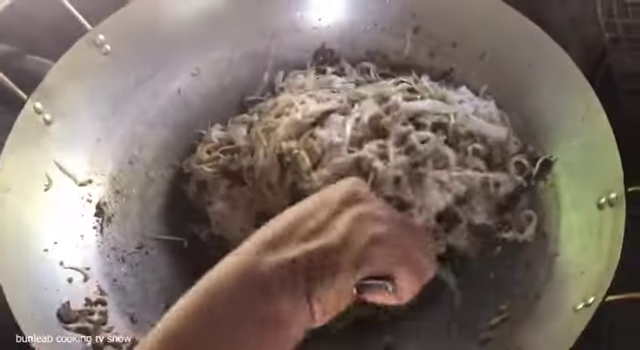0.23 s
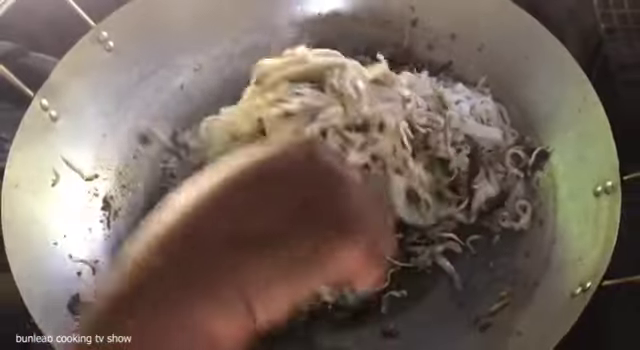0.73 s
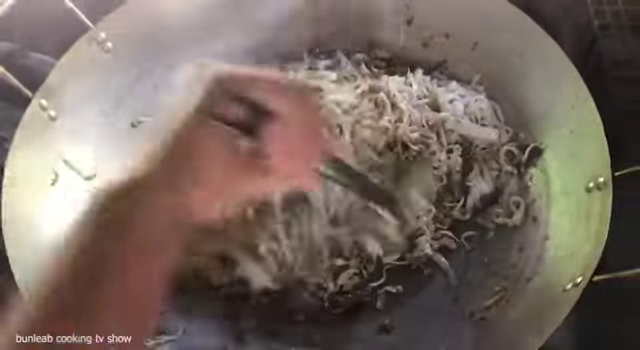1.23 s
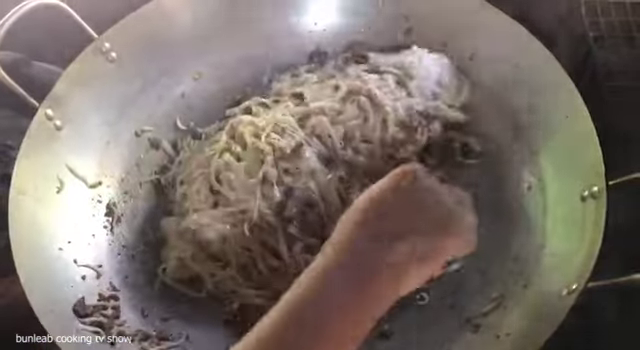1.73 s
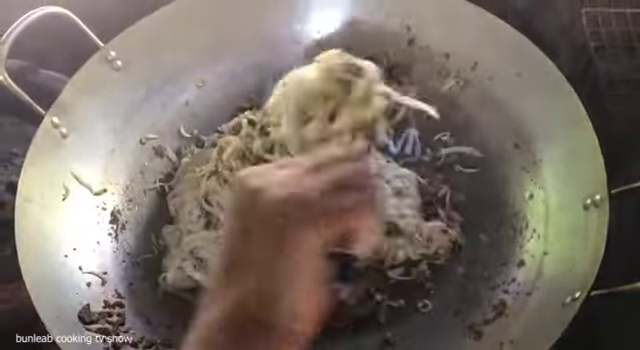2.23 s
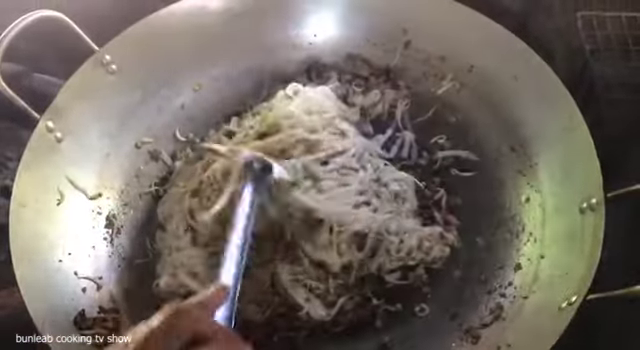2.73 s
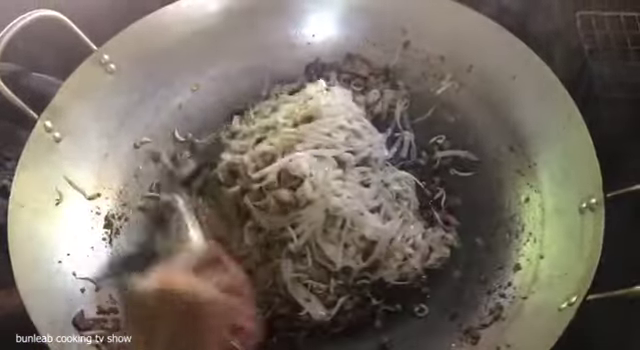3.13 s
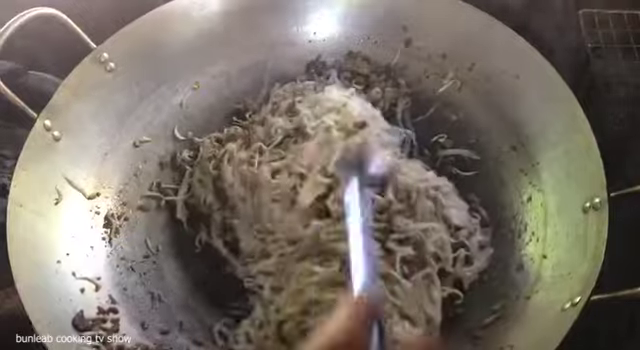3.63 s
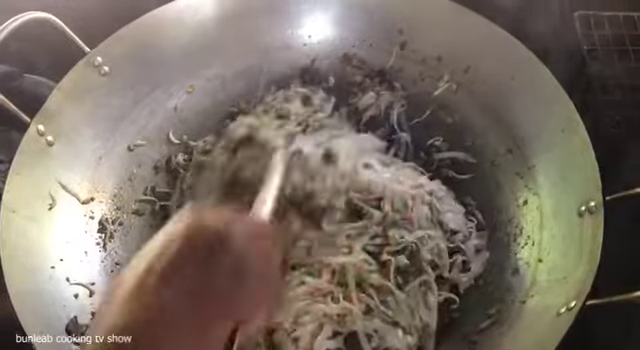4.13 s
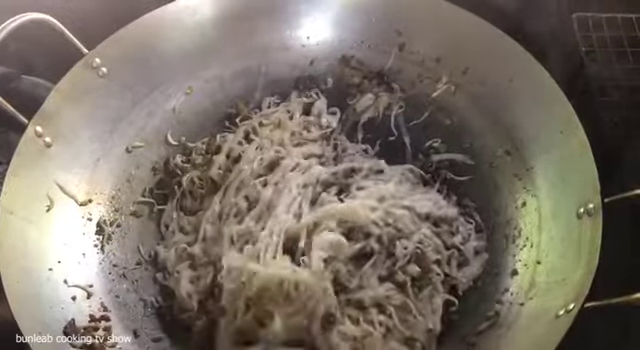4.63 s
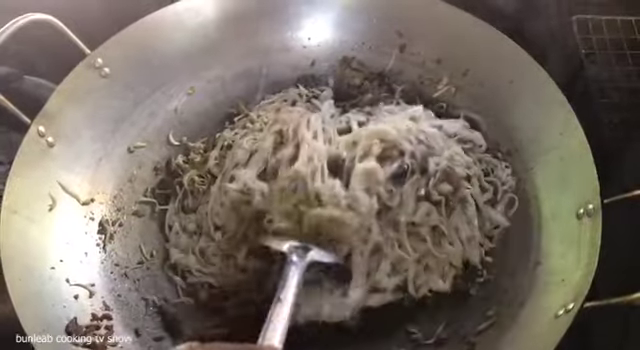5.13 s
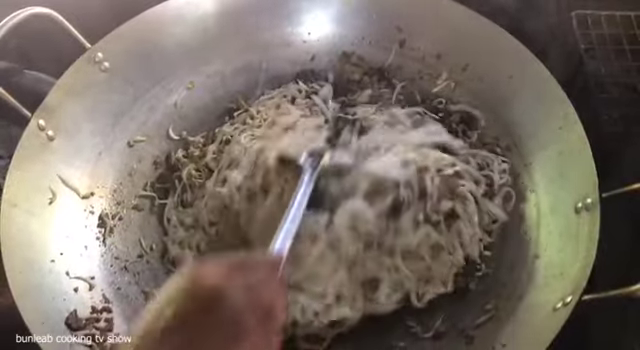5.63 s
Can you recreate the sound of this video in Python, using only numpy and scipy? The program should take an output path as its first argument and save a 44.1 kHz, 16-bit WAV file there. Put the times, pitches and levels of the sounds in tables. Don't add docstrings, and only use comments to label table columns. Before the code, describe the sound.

Continuous wet sizzle and fine crackle, swelling whenever the food is turned. A metal blade drags roughly over steel at the start and again after the first clank; three bouncing metallic knocks ring briefly, damped by the food. Sharp oil spits pop between them. Faint falling bird whistles and a low engine hum sit far behind. Recorded close, almost mono, with slightly dull treble, in an open shed.

```python
import sys
import numpy as np
from scipy import signal
from scipy.io import wavfile

SR = 44100
rng = np.random.default_rng(int(sys.argv[2]) if len(sys.argv) > 2 else 0)


def waveform_to_disk(signal):
    frames = np.transpose(np.atleast_2d(signal))
    scaled = np.clip(frames, -1, 1) * 32767
    samples = np.round(scaled).astype(np.int16)
    wavfile.write(sys.argv[1], SR, samples)


def magnitude_from_level(level_db):
    exponent = np.asarray(level_db, float) / 20
    return 10 ** exponent


N = 260190

# hz, level_db (per Hz)
RUMBLE_SPECTRUM = [(15, -38), (25, -9), (48, 3), (109, 0.5), (144, -5), (189, -7), (237, 0), (301, 0.5),
                   (487, -9), (667, 0), (900, -4), (1170, -34), (1980, -120)]


def rms_one(x):
    return x / np.sqrt(np.mean(x ** 2) + 1e-20)


def in_time(rows):
    s, *columns = np.transpose(rows)
    return [np.interp(np.arange(N) / SR, s, column) for column in columns]


def band(x, low, high):
    return signal.sosfilt(signal.butter(2, [low, min(high, .45 * SR)], "band", fs=SR, output="sos"), x)


def high_pass(x, order, hz):
    return signal.sosfilt(signal.butter(order, hz, "high", fs=SR, output="sos"), x)


def drift(rate_hz):
    r = np.exp(-80 * np.pi * rate_hz / SR)
    slow = signal.lfilter([1], [1, -2 * r, r * r], rng.standard_normal(N // 40 + 2002))[2000:]
    return np.interp(np.arange(N) / 40, np.arange(len(slow)), rms_one(slow))


def bump(t, centre_s, half_length_s):
    return np.clip(1 - np.abs(t - centre_s) / (2 * half_length_s), 0, 1)


def ring(clicks, hz, t60_s):
    r = magnitude_from_level(-60 / (t60_s * SR))
    w = 2 * np.pi * hz / SR
    return signal.lfilter([0, np.sin(w)], [1, -2 * r * np.cos(w), r * r], clicks + 1e-18)


def short_rings(rows):
    out, t = np.zeros(N + 4000), np.arange(4000) / SR
    for s, db, hz, t60 in rows:
        at = round(s * SR)
        onset = 1 - np.exp(-t * hz * 3)
        out[at:at + 4000] += magnitude_from_level(db - 60 * t / t60) * np.sin(2 * np.pi * hz * t) * onset
    return out[:N]


def grains(per_s, spread_db):
    sizes_db = spread_db * np.minimum(rng.exponential(1, N), 5)
    sizes = magnitude_from_level(sizes_db) * rng.choice([-1, 1], N)
    return rms_one(sizes * (rng.random(N) < per_s / SR))


def coloured(sources, spectrum, low, high, patchy_db):
    edges = np.geomspace(low, high, round(3 * np.log2(high / low)) + 1)
    hz, db = np.transpose(spectrum)
    out = 0
    for k, (a, b) in enumerate(zip(edges, edges[1:])):
        level_db = np.interp(np.log(a * b) / 2, np.log(hz), db)
        out = out + magnitude_from_level(level_db + patchy_db * drift(20.0)) * band(sources[k % len(sources)], a, b)
    return rms_one(out)


def frying():
    # hz, level_db (per Hz)
    fry_spectrum = [(260, -44), (450, -1.5), (611, -9.5), (674, -5), (1010, -3.5), (1370, -1.5), (1510, 0),
                    (1810, -3), (3240, -4), (4920, -7), (11200, -10), (12000, -38), (12500, -30),
                    (16200, -60), (22000, -120)]
    # time_s, vigour_db, bare_db (how far bare pan is uncovered)
    sizzle = [(0.0, -43.5, -3), (.55, -47.5, -0.5), (1.17, -44.5, 3), (1.75, -44, -2), (2.55, -41, -2.5),
              (3.17, -45, 0.5), (3.28, -34, -5.5), (3.53, -43, -0.5), (3.75, -43, -5.5), (4.09, -48.5, -3),
              (4.18, -40, -7), (4.67, -45.5, -5), (4.81, -39.5, -0.5), (5.34, -48.5, -1),
              (5.56, -47.5, -3.5), (5.68, -41, -2), (5.8, -40.5, -5.5), (5.9, -47, -2)]
    # time_s, more_sliding_db
    shoves = [
        (.04, 10),
        (.76, 3.5),
        (1.2, 5),
        (1.58, 7),
        (3.28, 5.5),
        (4.13, 4.5),
        (4.93, 6),
    ]
    snaps = grains(400, spread_db=3.5)
    surge = magnitude_from_level(0.17 * drift(1.07))

    def burst(share):
        return [rng.standard_normal(N) + share * grains(3000, spread_db=4.5) + 0.39 * snaps for _ in "ab"]

    crackle_db, bare_db = in_time(sizzle)
    vigour_db = crackle_db + 44
    t = np.arange(N) / SR
    shove_db = sum(db * bump(t, s, 0.11) for s, db in shoves)

    wet = coloured(burst(1.0), fry_spectrum, 533, 1948, patchy_db=0.18)
    wet = magnitude_from_level(-45.5 + 0.66 * vigour_db - 0.22 * bare_db) * wet
    bowl_hz, stirred_hz, width_hz = 1253, 1827, 185
    wet = wet + magnitude_from_level(-9) * band(wet, bowl_hz - width_hz / 2, bowl_hz + width_hz / 2)
    stirred = band(wet, stirred_hz - width_hz, stirred_hz + width_hz)
    wet = wet + magnitude_from_level(-15 + 1.1 * vigour_db) * stirred

    crackle = magnitude_from_level(crackle_db) * coloured(burst(0.72), fry_spectrum, 2070, 4650, patchy_db=1.0)
    crackle = crackle + (magnitude_from_level(0.39 * bare_db) - 1) * band(crackle, 3320, 6640)
    fizz = coloured(burst(0.55), fry_spectrum, 4840, 12060, patchy_db=1.06)
    fizz = magnitude_from_level(-44 + 0.97 * vigour_db + bare_db) * fizz

    slide = coloured(burst(1.0), RUMBLE_SPECTRUM, 176.0, 554, patchy_db=1.0)
    slide = magnitude_from_level(-57 + 0.46 * vigour_db + shove_db) * slide
    return surge * (wet + crackle + fizz + slide)


def spits():
    # start_s, peak_db, pitch_hz
    pops = [(0.264, -26, 1290), (0.4244, -30, 2230), (1.037, -19.5, 1330), (1.31, -24, 1170),
            (1.761, -19, 2200), (2.0971, -20, 1830), (2.3103, -25, 1420), (2.3373, -22, 1420),
            (2.3883, -18, 1630), (2.977, -16, 4150), (4.7836, -15.5, 1750), (4.828, -31, 1350),
            (4.895, -22, 1200), (4.915, -24, 2680)]
    snaps = np.zeros(N)
    for s, db, hz in pops:
        snaps[round(s * SR)] = magnitude_from_level(db + 5.0)
    return short_rings([(s, db, hz, 6 / hz) for s, db, hz in pops]) + band(snaps, 1500, 9000)


def blows():
    # pitch_hz, t60_s, right_wall_db, left_wall_db, far_wall_db
    struck_modes = [(193, 0.041, -15.5, -3, -17), (270, 0.048, -11.5, -9, -1), (300, 0.056, -13, -24, -12),
                    (364, 0.041, -11, 1, 0), (375, 0.21, -11, -24, -28), (476, 0.033, -19, -14, -7),
                    (688, 0.045, -39, -14.5, -23), (974, 0.14, -23.5, -19, -22), (1110, 0.26, -19.5, -20, -15),
                    (1207, 0.047, -14.5, -16, -24), (1627, 0.032, -34, -13, -5), (1868, 0.11, -30, -18, -9.5),
                    (2046, 0.044, -11, -20, -16), (2420, 0.043, -5.5, -7.5, -17),
                    (2720, 0.056, -18, -4.5, -12), (2695, 0.018, -10, 1, -2.5),
                     (3014, 0.014, -2.5, 2.5, 4.5), (3065, 0.035, -6, -26, -2),
                     (3204, 0.017, -15, -16, -10), (3490, 0.029, -11.5, -20, -28),
                     (3894, 0.023, -5.5, -6, -17), (4530, 0.039, -11, -11.5, -9.5),
                     (5320, 0.03, -21, -12.5, -36), (6200, 0.043, -15, -22, -22),
                     (7010, 0.063, -24, -20, -25), (8900, 0.015, -11, -12, -10.5),
                     (9620, 0.025, -13, -12, -24), (11500, 0.013, -20, -30, -12)]
    # low_hz, high_hz, t60_s, right_wall_db, left_wall_db, far_wall_db
    tails = [(215, 500, 0.34, -52, -28, -28), (650, 1190, 0.36, -43, -25.5, -27.5),
             (1540, 1960, 0.32, -40, -36, -28.5), (2430, 3320, 0.39, -25, -28, -29.5),
             (3460, 4660, 0.25, -26, -28, -29.5), (4900, 6700, 0.29, -31.5, -31.5, -31.5),
             (7500, 12000, 0.21, -29.5, -30.5, -32.5)]
    # start_s, ring_db, thud_db, crack_db
    right_wall = [
        (1.379, -48, -64, -45),
        (1.391, -10.5, -15, -12),
        (1.395, -28, -16, -13.5),
        (1.410, -32, -17, -36),
        (1.414, -14, -14, -26),
        (1.431, -17, -20.5, -38),
        (1.437, -16.5, -14.5, -29),
        (1.485, -28, -28, -46),
    ]
    left_wall = [
        (3.06, -7, -15, -17),
        (3.0626, -37, -6.5, -9),
        (3.0668, -21, -16, -18),
        (3.0764, -27, -22.5, -40),
        (3.083, -38, -39, -43),
        (3.113, -29, -32, -46),
        (3.124, -26, -33, -50),
        (3.202, -50, -42.5, -41),
    ]
    far_wall = [
        (3.9593, -5.5, -31, -7.5),
        (3.9634, -8, -10, -26),
        (3.9685, -11, -19.5, -12),
        (3.976, -33, -24, -44),
        (4.001, -28, -36, -47),
    ]
    wall_damping = [0.92, 0.98, 0.91]
    modes = struck_modes
    body, cracks, t = np.zeros(N), np.zeros(N), np.arange(SR // 2) / SR
    for wall, rows in enumerate([right_wall, left_wall, far_wall]):
        s, ring_db, thud_db, crack_db = np.transpose(rows)
        start = round(s[ring_db.argmax()] * SR) - 1000
        at = np.round(s * SR).astype(int) - start
        for i, db in zip(at, crack_db):
            decay = magnitude_from_level(db - 60 * t[:1500] / 0.0092)
            cracks[start + i:start + i + 1500] += decay * rng.standard_normal(1500)
        scatter_db = rng.normal(0, 1.5, (len(modes), 12))
        for k, (hz, t60, *db) in enumerate(modes):
            strength_db = thud_db if hz < 800 else ring_db
            clicks = np.zeros(len(t))
            clicks[at] = magnitude_from_level(strength_db + scatter_db[k, :len(at)])
            sounding = ring(clicks, hz, t60 * wall_damping[wall])
            body[start:start + len(t)] += (-1) ** k * magnitude_from_level(db[wall]) * sounding
        for low, high, t60, *db in tails:
            noise = rms_one(band(rng.standard_normal(len(t)), low, high))
            decay = magnitude_from_level(db[wall] - 60 * t / t60) * np.clip(t / 0.0021, 0, 1)
            body[start + 1000:start + 1000 + len(t)] += decay * noise
    body = high_pass(body, 3, 155)
    return body, band(cracks, 780, 11600)


def scraping():
    # full_pressure_s, rise_s, hold_s, fall_s, level_db (rise and fall span 20 dB)
    strokes = [
        (.044, 0.058, 0.033, 0.079, -24.5),
        (.115, 0.044, 0.047, 0.054, -36),
        (1.56, .13, 0.013, 0.0086, -26),
        (1.582, .02, 0.079, 0.026, -27),
        (3.322, 0.066, 0.015, 0.31, -36.5),
    ]
    # pitch_hz, width_hz, level_db
    blades = [
        [(1070, 57, -7), (2046, 35, 1), (2460, 190, -2), (3040, 110, 0), (3550, 84, -3.5), (3840, 67, -1.5),
         (4220, 360, -7), (5280, 140, -8.5), (6000, 360, -18)],
        [(974, 120, -4), (1746, 17, 2), (1870, 82, -2.5), (2500, 210, -4), (2840, 32, -9), (3360, 110, -3.5),
         (3960, 48, -7), (4140, 85, -10)],
        [(1100, 98, -3), (2010, 27, -6), (2320, 10, 2.5), (2520, 140, -0.5), (3050, 66, -8), (3240, 15, 1),
         (3420, 33, -7), (4040, 43, -0.5), (4620, 40, -4.5)],
        [(1060, 53, -7), (1890, 56, -2), (2574, 30, 4.5), (3000, 73, 3), (3350, 66, -2), (3910, 44, -4),
         (4060, 35, -4), (4470, 120, -7)],
        [(1070, 600, -1), (1640, 750, 1), (2450, 470, 2), (3150, 580, 0), (4220, 970, -19)],
    ]
    low_modes_db = [-17.5, 1.5, -17.5, -8, 1]
    # time_s, louder_db
    catches = [
        (.006, 11.5),
        (.037, 4),
        (.062, 4.5),
        (.078, 1.5),
        (.102, 3.5),
        (0.121, 4.5),
        (1.566, 2),
        (1.632, 3),
        (1.657, 1.5),
    ]
    out = np.zeros(N)
    edge = grains(4000 * magnitude_from_level(2.0 * drift(60)), spread_db=2.8) + 0.5 * rng.standard_normal(N)
    length = SR * 3 // 4
    for grip, (full, rise, hold, fall, level_db) in enumerate(strokes):
        start = max(round(full * SR) - SR // 4, 0)
        slips = edge[grip * SR:][:length]
        t = (start + np.arange(length)) / SR - full
        low, high = 0.28 * band(slips, 890, 1570), 0.48 * band(slips, 1960, 3930)
        for k, (hz, width_hz, db) in enumerate(blades[grip]):
            r = np.exp(-1.35 * np.pi * width_hz / SR)
            poles = [1, -2 * r * np.cos(2 * np.pi * hz / SR), r * r]
            mode = (-1) ** k * magnitude_from_level(db) * signal.lfilter([1 - r * r, 0, r * r - 1], poles, slips)
            mode = mode * magnitude_from_level(3 * np.interp(t / .03, np.arange(-10, 30), rng.standard_normal(40)))
            if hz < 2000:
                low = low + mode
            else:
                high = high + mode
        low, high, hiss = rms_one(low), rms_one(high), rms_one(band(slips, 4700, 10600))
        pressure_db = level_db - 20 * np.maximum(np.maximum(-t / rise, (t - hold) / fall), 0)
        pressure_db += sum(db * bump(t + full, s, 0.0039) for s, db in catches)
        low_db = low_modes_db[grip] + 43 * np.clip(t, 0, hold)
        out[start:start + length] += magnitude_from_level(pressure_db) * (high + magnitude_from_level(low_db) * low + magnitude_from_level(-11) * hiss)
    return out


def handle_bumps():
    # start_s, level_db, pitch_hz, t60_s
    bumps = [
        (.672, -20.5, 300, 0.016),
        (.765, -23, 332, 0.016),
        (4.965, -24.5, 280, 0.031),
        (5.25, -50, 250, 0.028),
    ]
    return short_rings(bumps)


def shed(x):
    # low_hz, high_hz, t60_s, level_db
    shed_tail = [
        (300, 1600, 0.28, -27),
        (1350, 7000, 0.11, -23.5),
        (4940, 30000, 0.088, -41),
    ]
    t = np.arange(SR // 2) / SR
    echo = 0
    for low, high, t60, db in shed_tail:
        noise = rms_one(band(rng.standard_normal(len(t)), low, high))
        echo = echo + magnitude_from_level(db - 25.0 - 60 * t / t60) * noise
    return signal.fftconvolve(x, echo * np.clip(t / 0.0038, 0, 1))[:N]


def bird():
    # start_s, length_s, first_hz, last_hz, level_db
    peeps = [
        (1.705, .125, 5900, 3100, -48.5),
        (2.0, .085, 6250, 3300, -44.5),
        (4.735, .055, 6200, 5000, -47.5),
        (5.07, .075, 6200, 2600, -45.5),
    ]
    out = 0
    for s, length, top_hz, end_hz, db in peeps:
        t = np.arange(N) / SR - s
        done = np.clip(t / length, 0, 1)
        hz = top_hz - (top_hz - end_hz) * done ** (14.5 * length)
        hz = hz * (1 + .02 * drift(200))
        fade = np.clip(np.minimum(t, length - t) / .007, 0, 1)
        level = magnitude_from_level(db - 6 * (1 - done) + 2 * drift(200))
        out = out + np.sqrt(2) * fade * level * np.sin(2 * np.pi * np.cumsum(hz) / SR)
    return out


def street():
    # pitch_hz, level_db
    engine = [
        (53.8, -62),
        (140.0, -60),
    ]
    # time_s, level_db
    engine_swell = [
        (3.6, -16),
        (4.2, 3.5),
        (5.4, 0),
        (5.9, -26),
    ]
    rumble = coloured(rng.standard_normal((2, N)), RUMBLE_SPECTRUM, 29.0, 171.4, patchy_db=1.1)
    clock_s = np.cumsum(1 + 0.00996 * drift(1.69)) / SR
    orders = 0
    for hz, db in engine:
        orders = orders + np.sqrt(2) * magnitude_from_level(db + 2.9 * drift(2.2)) * np.sin(2 * np.pi * hz * clock_s)
    return magnitude_from_level(-53) * rumble + magnitude_from_level(in_time(engine_swell)[0]) * orders


def scene():
    body, cracks = blows()
    rubbing = scraping() + handle_bumps()
    mono = frying() + spits() + body + cracks + rubbing + shed(rubbing) + bird() + street()
    apart = magnitude_from_level(-22) * band(band(cracks, 4700, 10300), 4700, 10300)
    return np.stack([mono + apart, mono - apart])


def top_cut(x):
    return signal.sosfilt(signal.butter(12, 12050, fs=SR, output="sos"), x)


def record(dry):
    rounded = high_pass(1.8 * np.tanh(dry / 1.8), 2, 35)
    low_pass = signal.cheby2(12, 60, 11940 * 1.095, fs=SR, output="sos")
    mix = signal.sosfilt(low_pass, rounded)
    return top_cut(mix)


dry = scene()
out = record(dry)
waveform_to_disk(out)
```